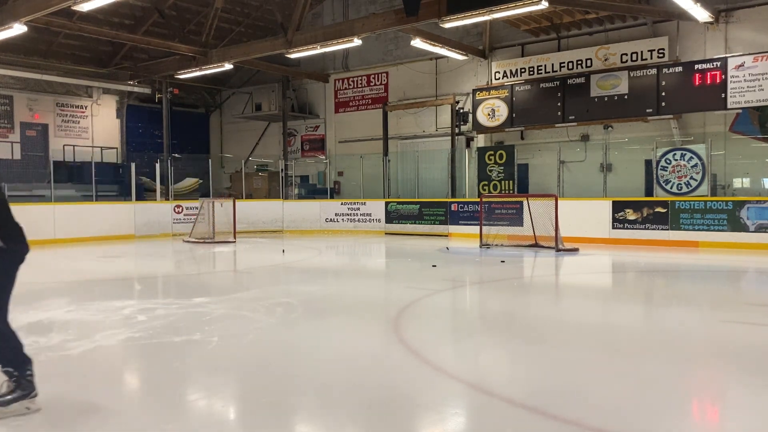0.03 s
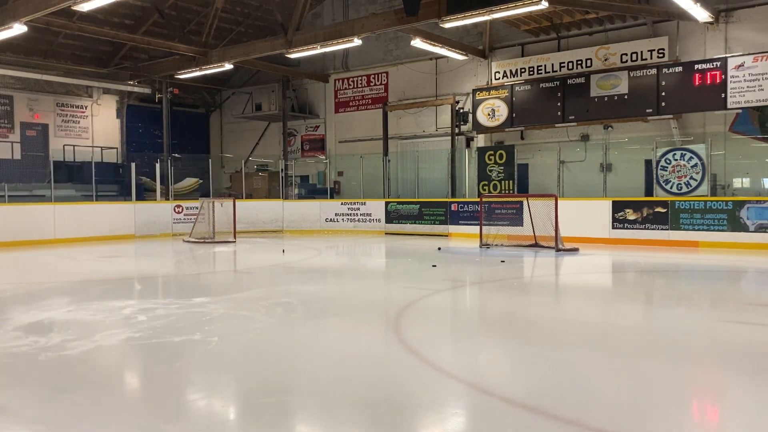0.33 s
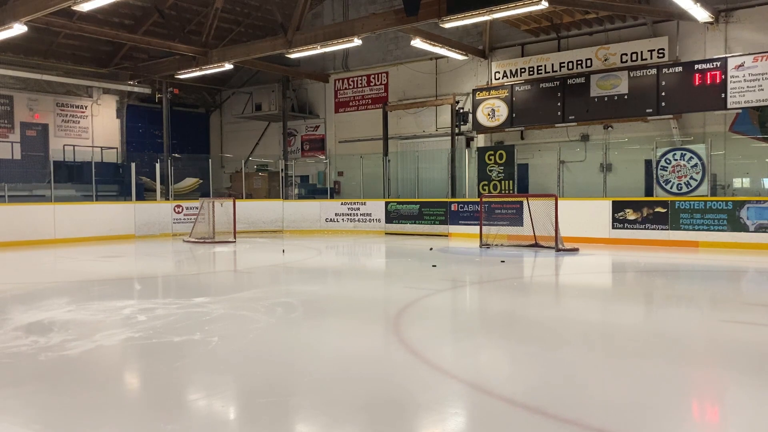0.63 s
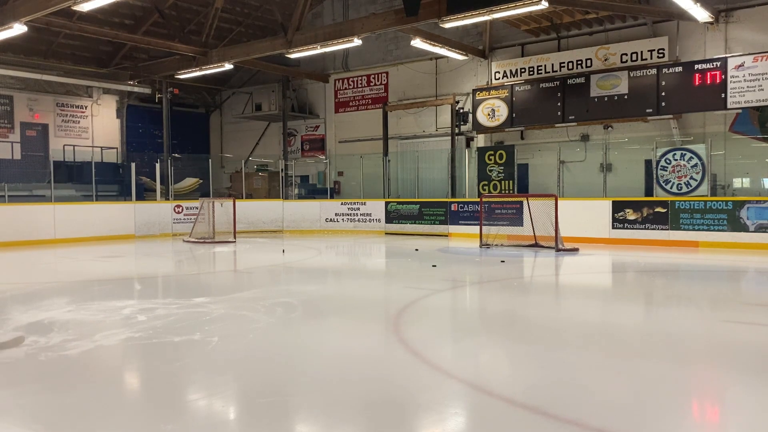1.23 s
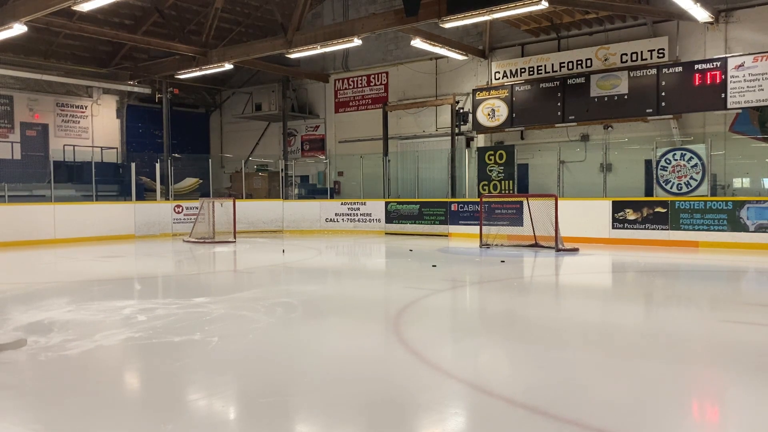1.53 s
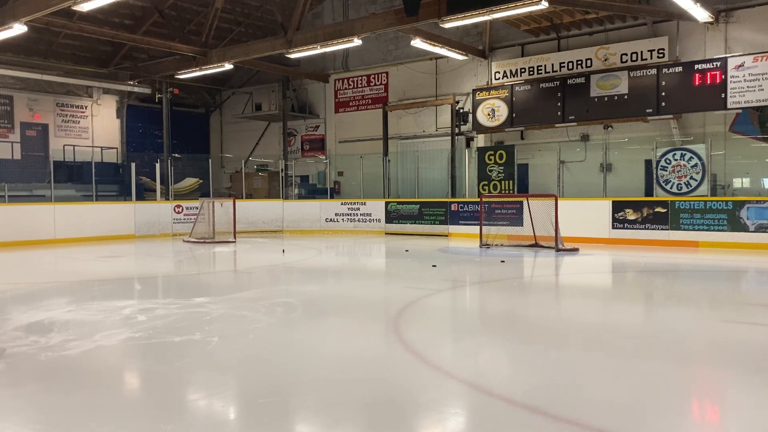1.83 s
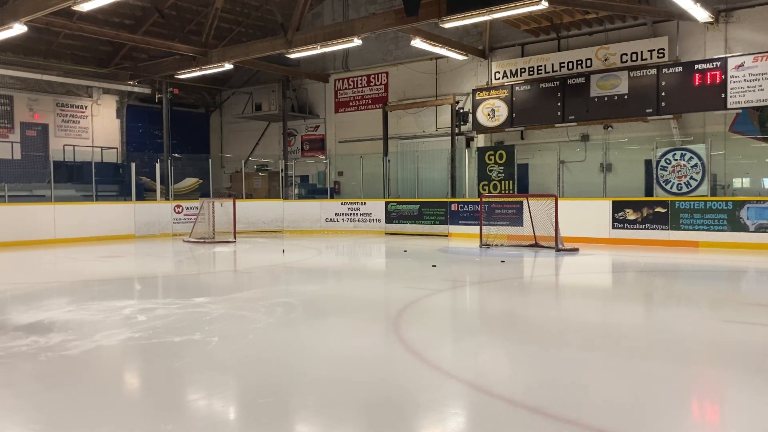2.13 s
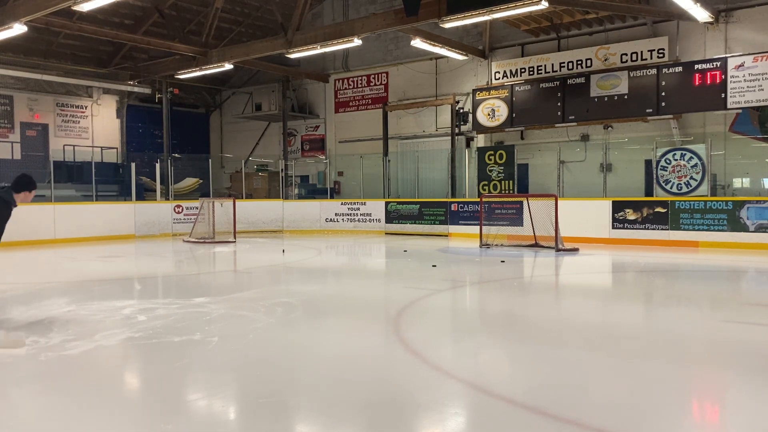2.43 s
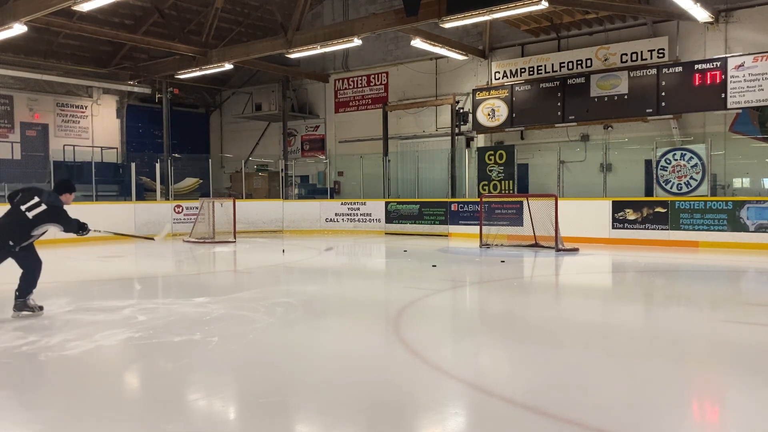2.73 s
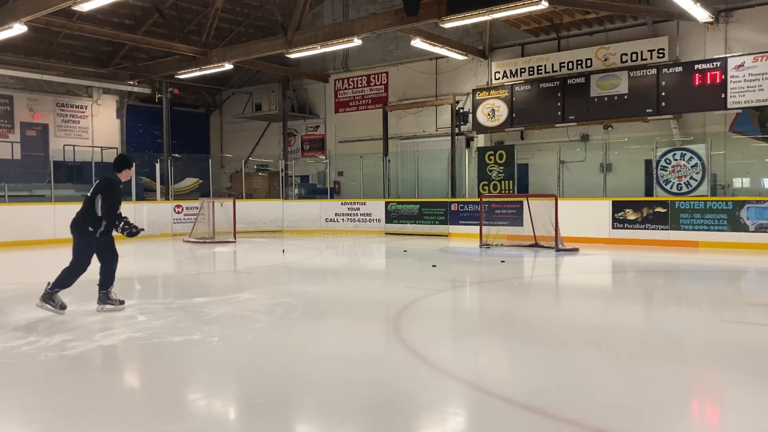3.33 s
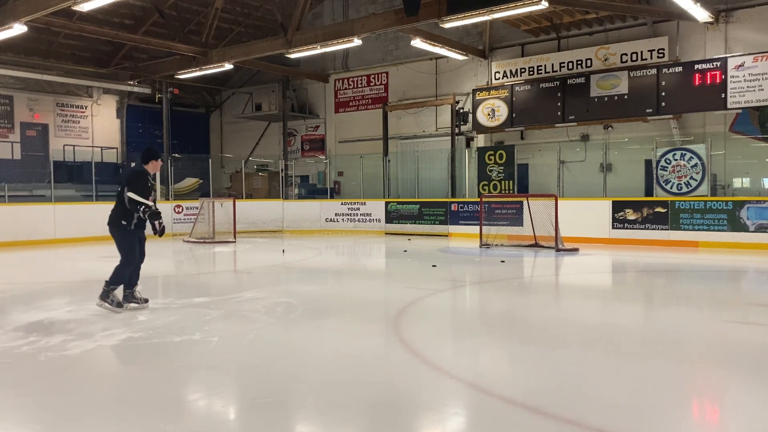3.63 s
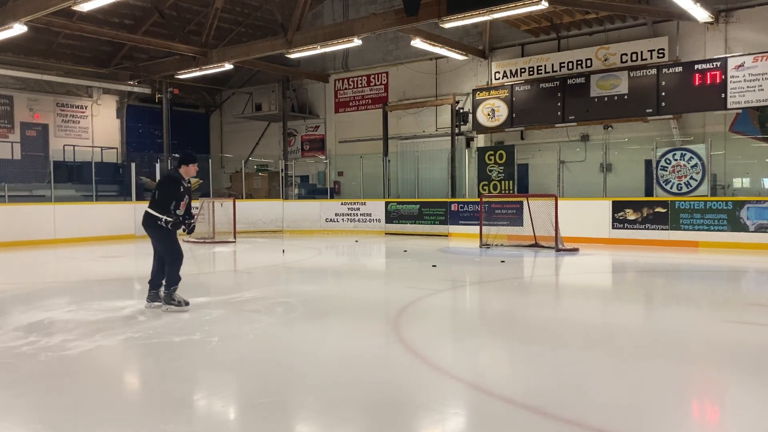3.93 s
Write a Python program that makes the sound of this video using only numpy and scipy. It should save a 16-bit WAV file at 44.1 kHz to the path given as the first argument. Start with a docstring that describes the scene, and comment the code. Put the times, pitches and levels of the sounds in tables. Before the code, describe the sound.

A hockey slap shot cracks after faint skate scrapes and stick taps on the left. Half a second later the puck booms into the boards and rattles the glass, ringing through a large indoor rink over a low ventilation hum.

```python
"""Machinery rumbles and hums in an empty indoor ice rink. Left of centre, skates scrape and click and
a stick taps the puck. Then a slap shot: the blade cracks on ice and puck, and the walls throw the
crack back. Half a second later the puck booms into the end boards and rattles the glass. The hall
rings for seconds; the loud blows duck the level, which creeps back."""
import sys
import numpy as np
from scipy import signal
from scipy.fft import rfft, irfft, next_fast_len
from scipy.io import wavfile
from scipy.ndimage import uniform_filter1d, minimum_filter1d, map_coordinates

SR = 44100
rng = np.random.default_rng(int(sys.argv[2]) if len(sys.argv) > 2 else 0)


def store_wav(level_fs):
    """Save 16-bit WAV to argv[1]."""
    pcm = np.round(np.clip(np.atleast_2d(level_fs), -1, 1) * 32767)
    wavfile.write(sys.argv[1], SR, pcm.T.astype(np.int16))


N = 176400


def amp(db):
    return 10 ** (np.asarray(db) / 20)


def unit_rms(x):
    return x / np.sqrt(np.mean(x ** 2) + 1e-20)


def log_interp(points, hz):
    freqs, values = np.transpose(points)
    return np.interp(np.log(hz + 1), np.log(freqs + 1), values)


def clock(n):
    return np.arange(n) / SR


def decay(t, t60_s):
    return np.exp(-np.log(1000) * t / np.maximum(t60_s, 1e-4))


def onset(t, rise_s):
    return 1 - np.exp(-(t / rise_s) ** 2)


def pan(left_db):
    return amp(np.array([[left_db], [-left_db]]) / 2)


def wobble(rate_hz):
    """Smooth random curve."""
    return map_coordinates(rng.standard_normal(N // 20), [clock(N) * rate_hz], mode="wrap")


def filtered(x, response):
    n = x.shape[-1]
    size = next_fast_len(n + n // 8)
    return irfft(rfft(x, size) * response(np.fft.rfftfreq(size, 1 / SR)), size)[..., :n]


def noise(spectrum, correlation, n=N):
    """Coloured stereo noise, rms 1."""
    def mid_side_gains(hz):
        angle = np.arccos(np.clip(log_interp(correlation, hz), -1, 1)) / 2
        return amp(log_interp(spectrum, hz)) * [np.cos(angle), np.sin(angle)]
    mid, side = filtered(rng.standard_normal((2, n)), mid_side_gains)
    return unit_rms(np.array([mid + side, mid - side]))


def add(out, start_s, x):
    i = int(round(start_s * SR))
    out[:, i:i + x.shape[-1]] += x[..., :N - i]


def ring(modes, attack_s=0.00038):
    """Damped modes after one blow; softer contact, slower attack."""
    t = clock(SR // 5)
    tones = sum(amp(db) * np.sin(2 * np.pi * hz * t) * decay(t, t60_s) for hz, db, t60_s in modes)
    return onset(t, attack_s) * tones


def burst(spectrum, t60_s, attack_s=0.0002):
    """Short noisy crack of a contact."""
    t = clock(SR // 5)
    return noise(spectrum, correlation=[(1000, 0.21)], n=len(t)) * decay(t, t60_s) * onset(t, attack_s)


def snap(width_s):
    """Single push and pull of air from a hard contact."""
    u = clock(SR // 5) / width_s
    return 2 * u * (2 - u) * np.exp(-u)


VENT_SPECTRUM = [(15, -72), (28, -41), (42, -11), (62, -7), (85, -4.5), (140, -11), (174, -7), (200, -15.5),
                 (242, -9), (320, -16.5), (900, -22), (2200, -30), (3100, -41), (7000, -51.5), (11000, -58),
                 (16000, -65)]  # ventilation: freq_hz, density_db
VENT_STEREO = [(60, 0.72), (130, 0.92), (290, 0.73), (640, -0.2), (1400, -0.06), (3100, 0.49),
               (7000, 0.017)]  # left-right likeness: freq_hz, correlation
MAINS_PARTIALS = [(59.2, -32.5), (118.4, -40), (236.9, -49.5)]  # hum: pitch_hz, level_db
def machinery():
    """Ventilation rumble and a wavering mains hum that slowly grows fainter."""
    t = clock(N)
    waver_rad, sink_db_per_s = 0.3, 1.5
    hum = np.zeros(N)
    for hz, db in MAINS_PARTIALS:
        peak = np.sqrt(2) * amp(db + 0.89 * wobble(4.86))
        hum += peak * np.sin(2 * np.pi * hz * t + waver_rad * wobble(5.44))
    rumble = amp(-32) * noise(VENT_SPECTRUM, VENT_STEREO)
    return pan(left_db=2) * (rumble + amp(-1 - sink_db_per_s * t) * hum)


HALL_DECAY = [(100, 10), (400, 11.6), (1000, 6.46), (2000, 5.06), (4000, 2.2), (7000, 0.99), (13000, 0.25)]  # reverberation: freq_hz, t60_s
HALL_STEREO = [(60, 1), (140, 0.94), (290, 0.58), (640, -0.2), (1400, -0.15), (3100, 0.4), (10000, 0.093)]  # left-right likeness: freq_hz, correlation
def hall(spectrum, rise_s):
    """Uneven reflections build up, blur and die, treble first."""
    hz, frame_s, bands = signal.stft(noise(spectrum, HALL_STEREO), SR, nperseg=512)
    t60_s = log_interp(HALL_DECAY, hz)[:, None]
    tail = signal.istft(bands * decay(frame_s, t60_s), SR, nperseg=512)[1][:, :N]
    grain_db = 1.8 * (np.tanh(wobble(400)) + np.tanh(wobble(45)))
    return tail * amp(grain_db) * onset(clock(N), rise_s)


def crunch(depth_db):
    """Gain flutter from tiny fractures in the ice."""
    return amp(depth_db * np.tanh(1.1 * wobble(1200) + 0.48 * wobble(110)))


GLIDE_LEVELS = [(0, -45), (.35, -48.5), (.65, -51), (1.3, -57), (1.55, -46.5), (2.15, -49), (2.42, -47.5),
                (2.53, -31.5), (2.6, -32.5), (2.8, -37), (3.6, -52), (3.8, -33), (4, -34.5)]  # scrape envelope: time_s, level_db
GLIDE_SPECTRUM = [(200, 3.5), (600, 3.5), (2000, 1.5), (3500, -7.5), (7000, -19), (15000, -30.5)]  # blade on ice: freq_hz, density_db
SKATE_PUSHES = [(.06, .02, .05, -63), (0.332, 0.011, 0.028, -57.5), (2.28, .03, .04, -62),
                (2.441, 0.068, 0.031, -46), (2.865, .015, .02, -50.5), (2.95, .03, .12, -54.5),
                (3.692, .012, .008, -50)]  # push-offs: start_s, rise_s, hold_s, level_db
SPRAY_SPECTRUM = [(1500, -5), (5000, -7), (8000, 9), (15000, 0.5)]  # push-off hiss: freq_hz, density_db
SKATE_CLICKS = [(2.4337, -22.5, 3460), (3.6761, -10.5, 2940), (3.686, -14.5, 2960), (3.7062, -13.5, 2750),
                (3.7134, -14.5, 3020)]  # landings: start_s, level_db, pitch_hz
CLICK_SPECTRUM = [(400, -0.5), (2000, 3.5), (2950, 6.5), (4000, -2.5), (5000, -1.5), (6300, -8.5),
                  (10000, -12), (15000, -22)]  # steel meeting ice: freq_hz, density_db
STEEL_MODES = [(1, -1, 0.022), (1.75, -13, .014), (2.5, -17, .009)]  # blade ring: pitch_ratio, level_db, t60_s
def skates():
    """Blades grind over the ice, hiss at each push and click on landing."""
    t = clock(N)
    scrape = unit_rms(noise(GLIDE_SPECTRUM, HALL_STEREO) * crunch(depth_db=4.5))
    out = scrape * amp(np.interp(t, *np.transpose(GLIDE_LEVELS)) + wobble(11))
    for start_s, rise_s, hold_s, db in SKATE_PUSHES:
        swell = np.clip(t / rise_s, 0, 1) ** 2 * decay(np.maximum(t - rise_s - hold_s, 0), t60_s=0.45)
        hiss = unit_rms(noise(SPRAY_SPECTRUM, correlation=[(8000, 0.17)]) * crunch(depth_db=5))
        add(out, start_s, amp(db) * swell * hiss)
    for start_s, db, pitch_hz in SKATE_CLICKS:
        modes = [(ratio * pitch_hz, mode_db, t60_s) for ratio, mode_db, t60_s in STEEL_MODES]
        steel = amp(-2) * ring(modes, attack_s=0.00041)
        add(out, start_s, amp(db) * (burst(CLICK_SPECTRUM, t60_s=0.012) + steel))
        add(out, start_s, amp(db - 19.5) * hall(CLICK_SPECTRUM, rise_s=0.0084))
    return pan(left_db=2) * out


STICK_TAPS = [(.3127, -18.5, 2280, -2, 5), (.342, -29, 1900, -12, -2), (1.5751, -15, 1220, -15, -9),
              (1.922, -25, 2130, 6.5, 3), (2.017, -16.5, 786, -11, -5), (2.46, -22.5, 1570, -12, -4),
              (2.5376, -16.5, 1630, -15, -9)]  # light contacts: start_s, level_db, pitch_hz, overtone_db, snap_db
TAP_SPECTRUM = [(.12, 1), (.45, 1.5), (1, -0.5), (1.8, -10.5), (3.5, -23), (8, -47)]  # contact noise: pitch_ratio, density_db
def taps():
    """The stick nudges puck and ice; each contact has its own pitch."""
    out = np.zeros((2, N))
    for start_s, db, pitch_hz, overtone_db, snap_db in STICK_TAPS:
        spectrum = [(ratio * pitch_hz, density_db) for ratio, density_db in TAP_SPECTRUM]
        tone = amp(-2.5) * ring([(pitch_hz, 0, 0.022), (1.73 * pitch_hz, overtone_db, 0.018)], 0.00068)
        clack = burst(spectrum, t60_s=0.036, attack_s=0.00039)
        edge = amp(snap_db) * snap(width_s=0.24 / pitch_hz)
        add(out, start_s, amp(db - 8.5) * (clack + tone + edge))
        add(out, start_s, amp(db - 32.5) * hall(spectrum, rise_s=0.013))
    return pan(left_db=5) * out


PUCK_MODES = [(1424, -0.5, 0.021), (1653, 4.5, 0.015), (3520, -7, 0.0089)]  # knock: pitch_hz, level_db, t60_s
CRACK_SPECTRUM = [(100, -9), (1000, 7), (2800, 2.5), (5000, -13.5), (8000, -15), (15000, -42)]  # puck contact, boards or stick: freq_hz, density_db
PANEL_MODES = [(64, -27, .9), (158.5, -13, 0.19), (263, 2, 0.025), (386, -6, 0.045)]  # boom: pitch_hz, level_db, t60_s
PANEL_REBOUNDS = [(3.168, -11), (3.236, -10.5)]  # swings back against the frame: start_s, level_db
GLASS_RATTLES = [(3.14, -6.5, 5600), (3.147, -16, 7000), (3.1511, -5.5, 2560)]  # glass in its frame: start_s, level_db, centre_hz
GLASS_SPECTRUM = [(.07, -3), (.35, 3), (1, -2), (1.5, -7), (2.6, -19), (5, -30)]  # one rattle: centre_ratio, density_db
BOOM_SPECTRUM = [(35, -36), (75, 3.5), (150, 1.5), (240, 1), (310, -3), (400, 0), (700, 1.5), (1100, -4.5),
                 (1700, -6.5), (2500, -10), (3500, -14), (5000, -18.5), (8000, -25.5), (15000, -43.5)]  # shudder and hall tail: freq_hz, density_db
def boards(hit_s=3.1211, panel_lag_s=0.0019):
    """The puck knocks, the panel booms, the glass above rattles and the hall rolls on."""
    out, t = np.zeros((2, N)), clock(N)
    knock = amp(0.5) * ring(PUCK_MODES, attack_s=0.00077)
    crack = amp(-8.5) * burst(CRACK_SPECTRUM, t60_s=0.013)
    add(out, hit_s, amp(-1) * (knock + crack + amp(-8) * snap(width_s=0.00004)))
    add(out, hit_s + panel_lag_s, amp(-2) * ring(PANEL_MODES, attack_s=0.00096))
    for start_s, db in PANEL_REBOUNDS:
        add(out, start_s, amp(db) * ring(PANEL_MODES, attack_s=0.004))
    for start_s, db, centre_hz in GLASS_RATTLES:
        spectrum = [(ratio * centre_hz, density_db) for ratio, density_db in GLASS_SPECTRUM]
        add(out, start_s, amp(db - 5) * burst(spectrum, t60_s=0.021, attack_s=0.00052))
    shudder = noise(BOOM_SPECTRUM, HALL_STEREO) * decay(t, t60_s=0.7) * (1 - np.exp(-t / 0.0079))
    add(out, hit_s + 0.006, amp(-14) * shudder)
    add(out, hit_s, amp(-19) * hall(BOOM_SPECTRUM, rise_s=0.016))
    return pan(left_db=1.9) * out


BLADE_SLAPS = [(2.6043, -10, 11), (2.608, -3.5, -12), (2.6096, -12, -6)]  # on ice, then puck: start_s, level_db, snap_db
STICK_MODES = [(246, -19.5, 0.03), (767, -13, 0.033), (1075, -5, 0.042), (1670, 7, 0.0064),
               (2247, -10, 0.046), (2540, -11.5, 0.039), (3300, -13.5, 0.04)]  # stick and puck: pitch_hz, level_db, t60_s
WALL_ECHOES = [(.037, -21, 6), (.045, -17, 4), (.0733, 0, 1), (.097, -7, -10), (.1226, -6.5, -12),
               (.325, -16, -10)]  # walls and roof: delay_s, level_db, edge_db
SHOT_TAIL_SPECTRUM = [(100, -13), (450, -15), (680, -7), (900, 1.5), (1100, -2), (1450, -10.5),
                      (1750, -3.5), (1950, -9.5), (2230, -4.5), (2600, -11), (3000, -15.5), (3400, -15),
                      (4000, -18), (6000, -23), (10000, -29), (15000, -36)]  # hall tail: freq_hz, density_db
def slap_shot(right_lag_s=0.00023, air_cutoff_hz=10000):
    """The stick cracks on ice and puck; echoes return, dulled by the air, and the hall fills."""
    out, shot_s = np.zeros((2, N)), BLADE_SLAPS[0][0]
    for start_s, db, snap_db in BLADE_SLAPS:
        body = ring(STICK_MODES, attack_s=0.0001) + burst(CRACK_SPECTRUM, t60_s=0.019, attack_s=0.0001)
        edge = amp(snap_db) * snap(width_s=0.00005)
        crack = amp(db) * pan(left_db=6.8) * (amp(-5.5) * body + edge)
        add(out, start_s, crack * [[1], [0]])
        add(out, start_s + right_lag_s, crack * [[0], [1]])
    for delay_s, db, edge_db in WALL_ECHOES:
        edge = amp(-10) * burst(CRACK_SPECTRUM, t60_s=0.018) + amp(-2) * snap(width_s=0.00011)
        edge = filtered(edge, lambda hz: 1 / (1 + (hz / air_cutoff_hz) ** 8))
        echo = amp(-5.5) * ring(STICK_MODES) + amp(edge_db) * edge
        add(out, shot_s + delay_s, amp(db) * pan(left_db=2.2) * echo)
    add(out, shot_s + 0.012, amp(-18.5) * pan(left_db=1.4) * hall(SHOT_TAIL_SPECTRUM, rise_s=0.025))
    return out


def scene():
    """Quiet rink, run-up and two loud blows."""
    return machinery() + skates() + taps() + amp(4.5) * slap_shot() + amp(9) * boards()


def gain_control(x, threshold_db=-14.5, excess_share=0.7, recover_db_per_s=3):
    """Loud blows pull the gain down at once; it creeps back over seconds."""
    power = uniform_filter1d(np.mean(x ** 2, axis=0), size=400, origin=120)
    level_db = 10 * np.log10(np.abs(power) + 1e-12)
    needed_db = excess_share * np.maximum(level_db - threshold_db, 0)
    creep_db = recover_db_per_s * clock(N)
    cut_db = np.maximum.accumulate(needed_db + creep_db) - creep_db
    return x * uniform_filter1d(minimum_filter1d(amp(-cut_db), size=128), size=128)


TREBLE_DIPS = [(9010, 585, 25.5), (12970, 520, 26)]  # notches: centre_hz, width_hz, depth_db
def record(dry):
    """Gain control, rounded peaks, two narrow treble dips and a band limit."""
    ceiling, top_hz = 0.92, 15900
    def response(hz):
        dip_db = sum(db * np.exp(-((hz - centre) / width) ** 2) for centre, width, db in TREBLE_DIPS)
        return amp(-dip_db) * (hz < top_hz)
    ducked = gain_control(dry)
    rounded = ducked / (1 + np.abs(ducked / ceiling) ** 6) ** (1 / 6)
    return filtered(rounded, response)


dry = scene()
out = record(dry)
store_wav(out)
```